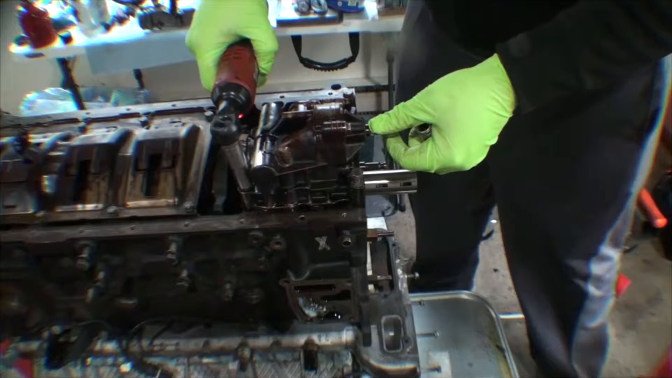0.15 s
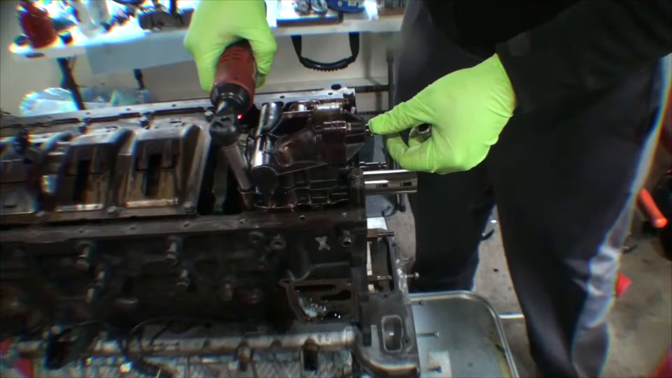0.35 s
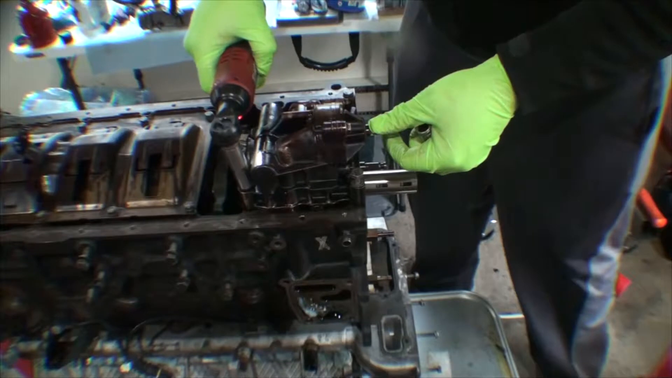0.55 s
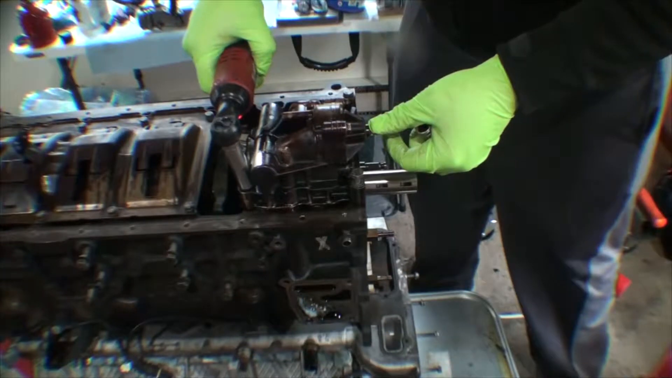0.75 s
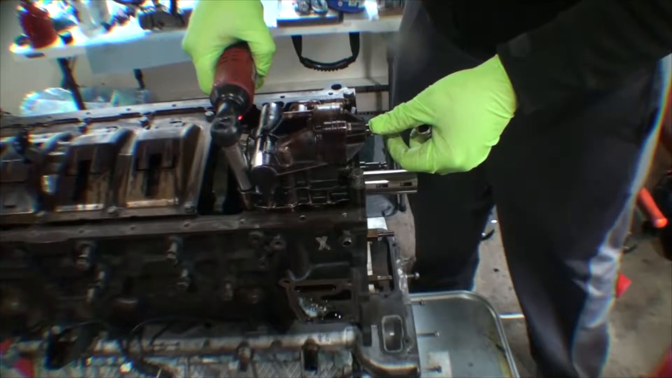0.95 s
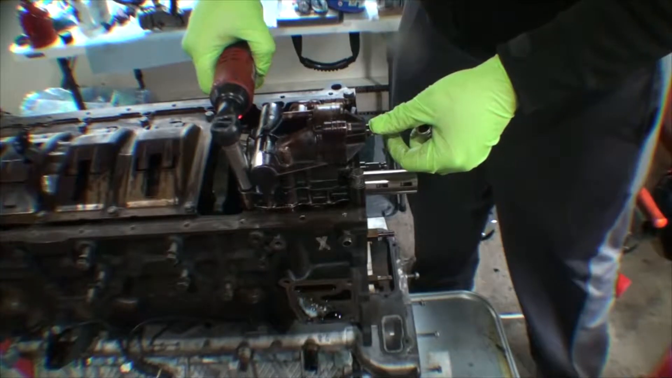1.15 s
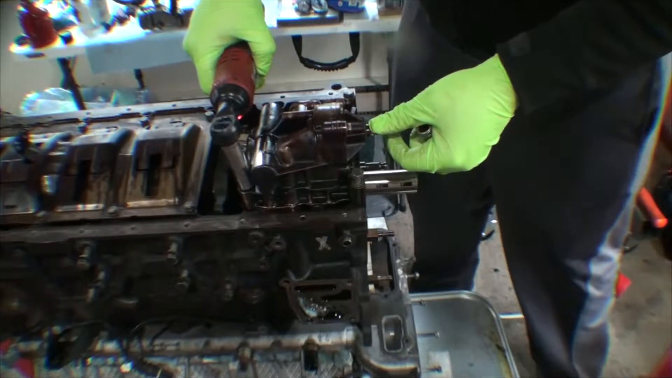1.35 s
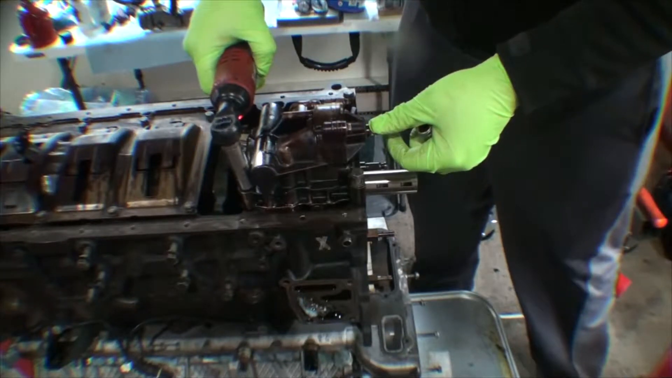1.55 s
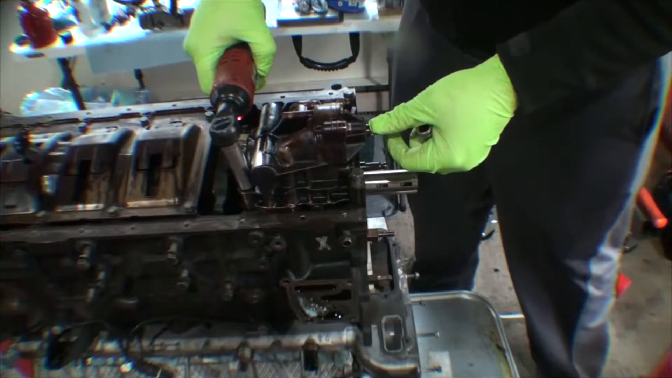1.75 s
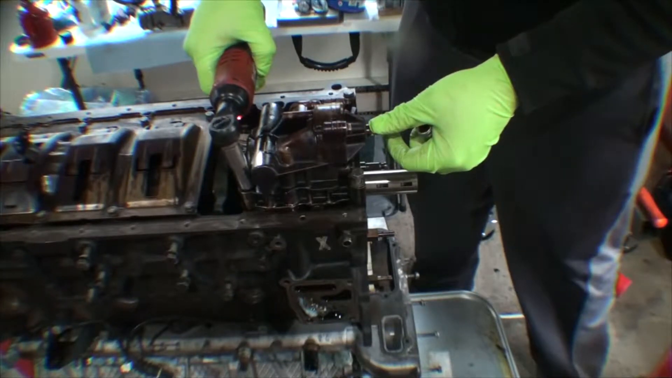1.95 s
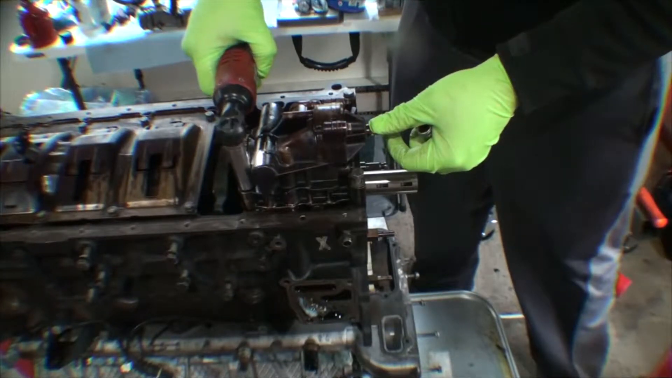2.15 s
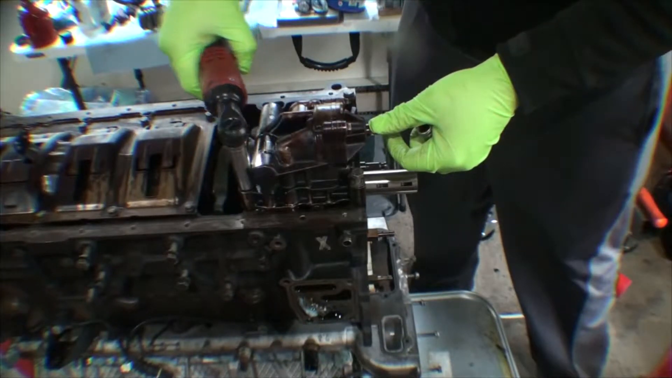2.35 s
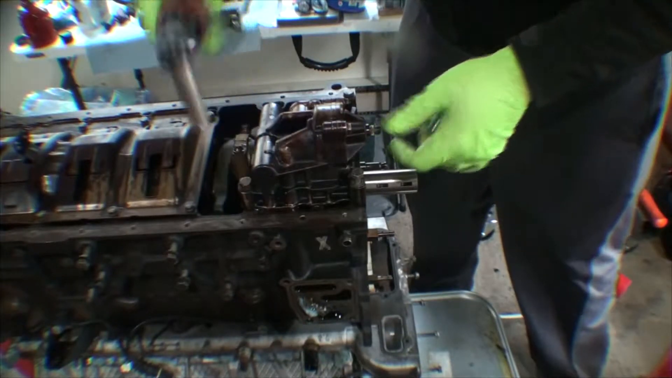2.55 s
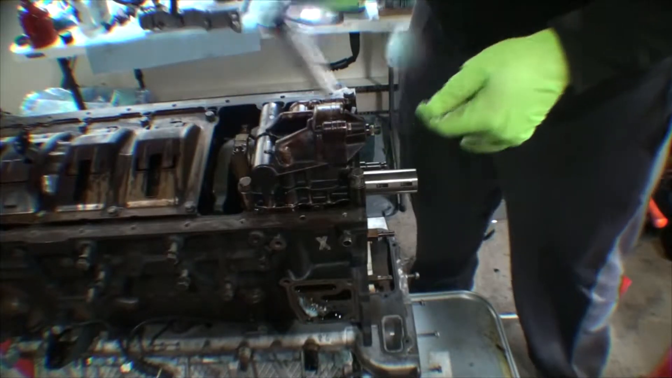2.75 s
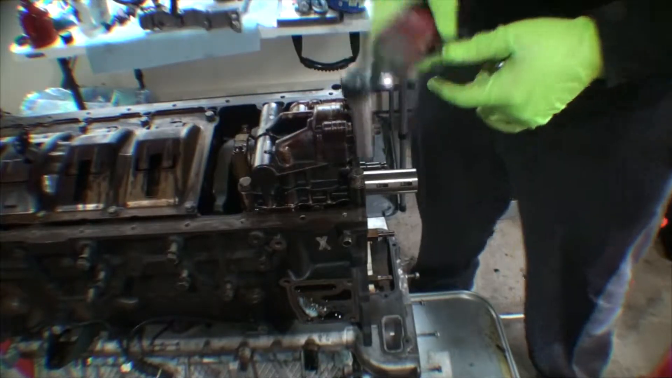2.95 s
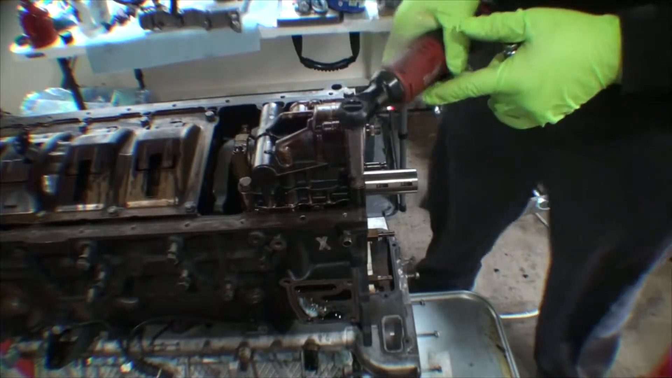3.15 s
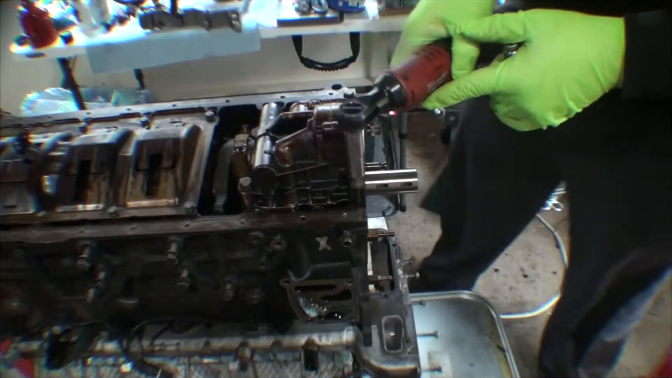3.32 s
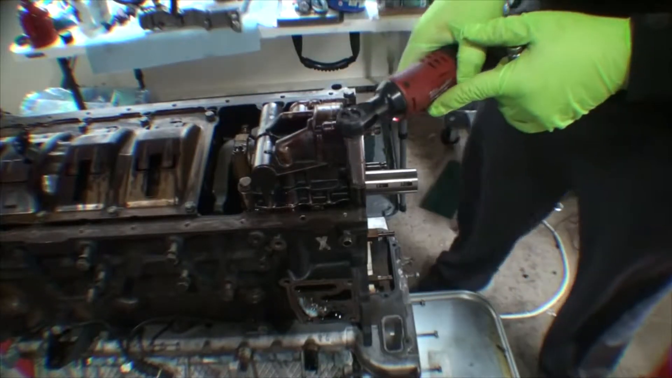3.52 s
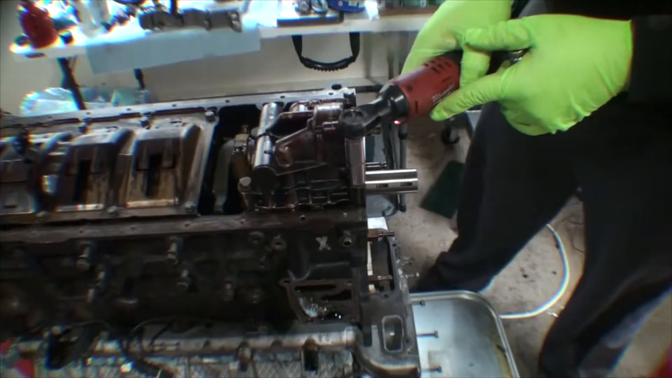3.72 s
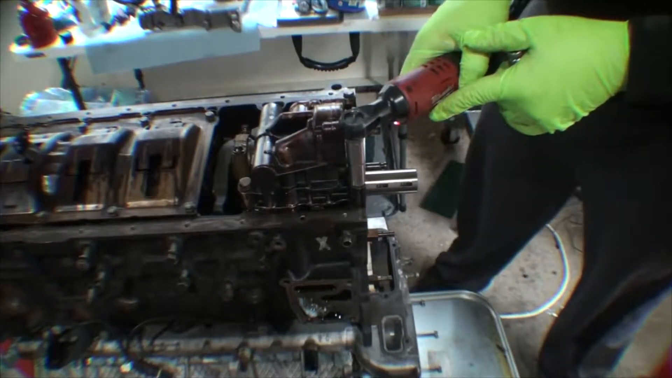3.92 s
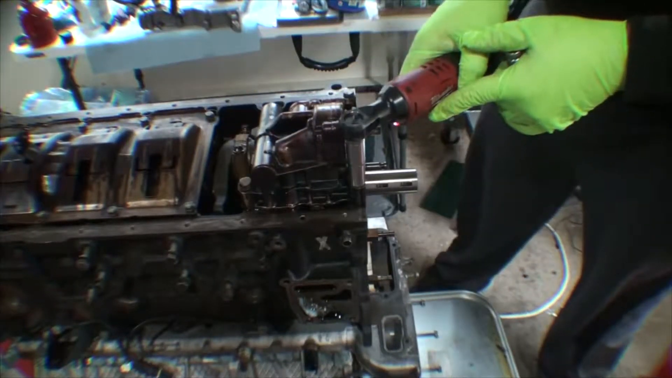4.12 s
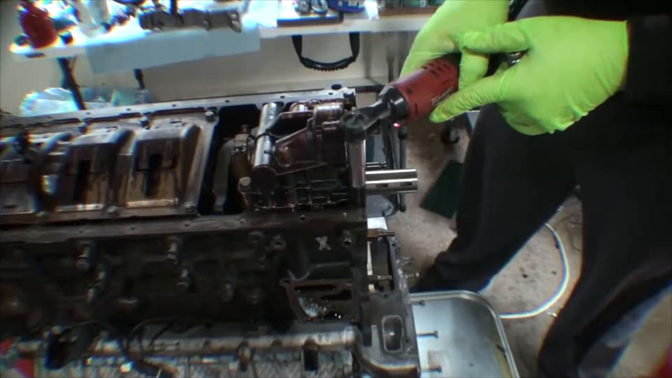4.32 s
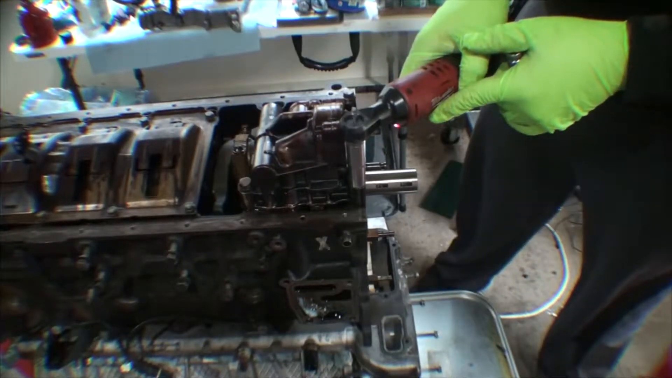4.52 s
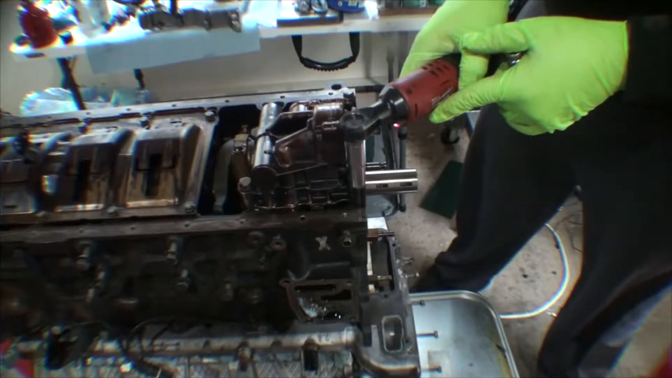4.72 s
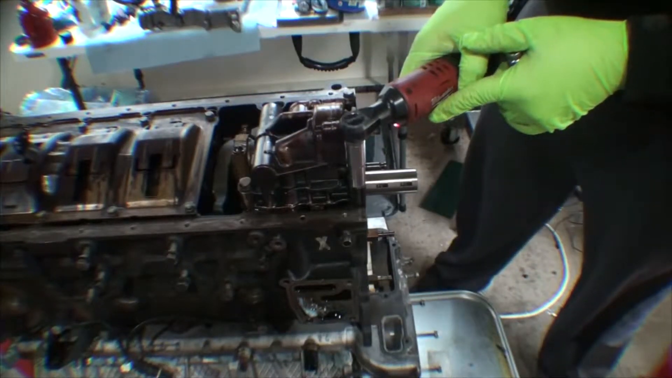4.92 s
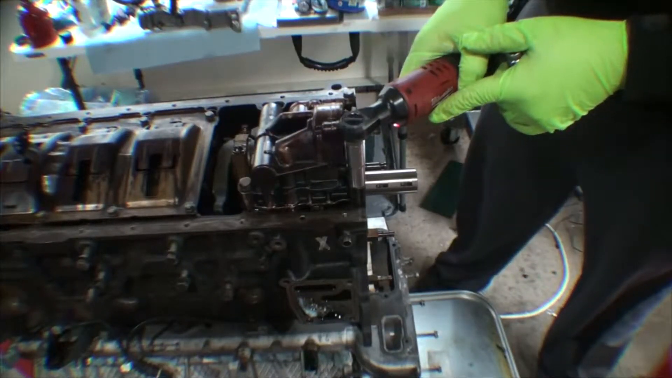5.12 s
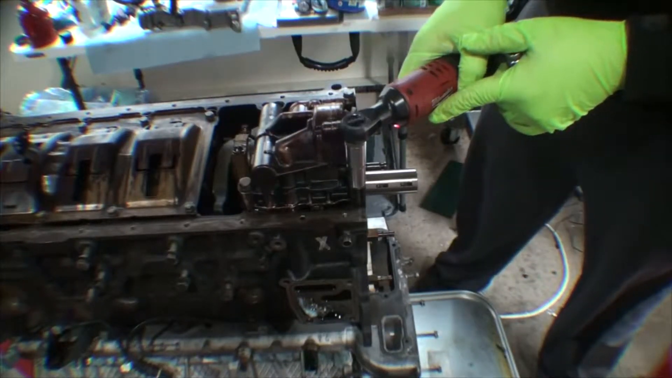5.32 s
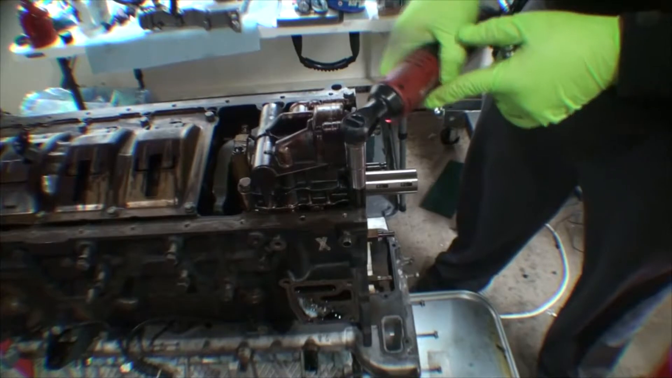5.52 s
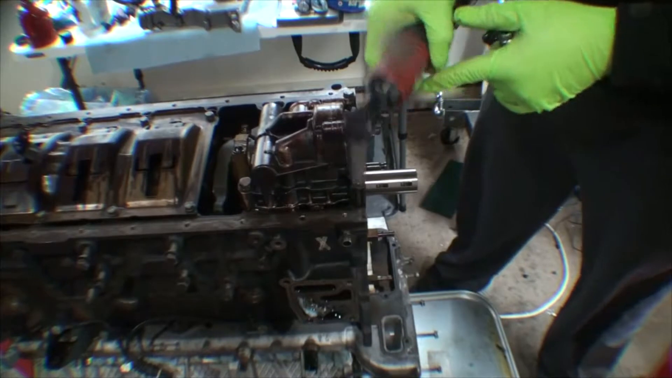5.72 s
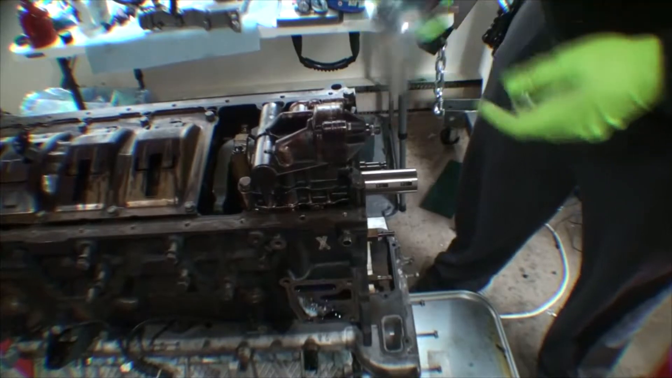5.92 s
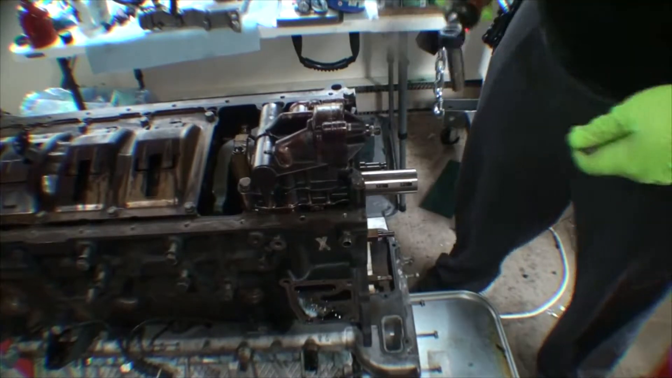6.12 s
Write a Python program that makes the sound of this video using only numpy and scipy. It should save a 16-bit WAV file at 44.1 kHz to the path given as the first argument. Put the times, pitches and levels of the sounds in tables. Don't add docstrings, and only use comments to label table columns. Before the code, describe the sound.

Already running, a power ratchet buzzes harshly on an engine block, rapid pawl clicks over gear rattle and brush hiss, sagging slowly in pitch until it knocks and stalls. It lifts off with light clinks and cloth rustle. A second, faster burst starts with a clatter, slows and ends in hard metallic knocks. Close stereo microphone, hard-walled workshop, quiet floor.

```python
import sys
import numpy as np
from scipy import signal
from scipy.fft import rfft, irfft, next_fast_len
from scipy.io import wavfile
from scipy.ndimage import uniform_filter1d

SR = 44100
rng = np.random.default_rng(int(sys.argv[2]) if len(sys.argv) > 2 else 0)


def ratio_of_db(decibels):
    return 10 ** (np.asarray(decibels, float) / 20)


def wav_out(sig):
    wavfile.write(sys.argv[1], SR, np.round(np.clip(np.atleast_2d(sig).T, -1, 1) * 32767).astype(np.int16))


N = 276504
T = np.arange(N) / SR

# time in seconds, drive in dB, pawl bite against drive in dB.
RUNS = [
    [(0, -22, -2), (.12, -25, 4.5), (.33, -25.5, 1.5), (.55, -25.5, 3.5), (.78, -26, 3.5),
     (1.25, -27.5, 5.5), (1.7, -26.5, 3.5), (2.09, -27, 4.5), (2.15, -28, 4), (2.26, -27, 1),
     (2.31, -26.5, 4.5), (2.33, -29, -15)],
    [(3.41, -64, -8), (3.428, -40.5, -30), (3.46, -31.5, -4.5), (3.51, -21.5, -5), (3.568, -21, -9),
     (3.585, -23.5, -1), (4.84, -23.5, 2.5), (5.15, -24, 0.3), (5.45, -25, -4), (5.52, -27, -7.5),
     (5.565, -22, -14)],
]
# level minus drive in dB, rise from in seconds, stall in seconds.
BRUSHES = [(-.4, -.3, 2.29), (3, 3.456, 5.54)]
# gears, pawl, pawl swing over the turn and yoke, all in dB.
BINDS = [(0.5, -3, 4.5, 2.5), (1.5, -1.5, 0.6, 1.5)]
STROKES_A_TURN, FIRST_BIND_STROKE = 20, 4.1


def level(x, db):
    return x * ratio_of_db(db) / np.sqrt(np.mean(x ** 2))


def colour(x, points, taps=2048):
    hz, db = np.transpose(points)
    bins_hz = np.fft.rfftfreq(taps, 1 / SR)
    log_gain = np.interp(np.log(bins_hz + 1), np.log(hz), db) * np.log(10) / 20
    cepstrum = irfft(log_gain)
    cepstrum[1:taps // 2] *= 2
    cepstrum[taps // 2 + 1:] = 0
    return signal.oaconvolve(x, irfft(np.exp(rfft(cepstrum))))[:len(x)]


def ring(x, hz, width_hz):
    return signal.lfilter(*signal.iirpeak(hz, hz / width_hz, SR), x)


def band(x, lo_hz, hi_hz):
    return signal.sosfilt(signal.butter(3, [lo_hz, hi_hz], "band", fs=SR, output="sos"), x)


def clicks(s, size):
    return np.bincount(np.clip(s * SR, 0, N - 1).astype(int), size, N)


def decay(s):
    return np.exp(-np.arange(int(8 * s * SR) + 2) / (s * SR))


def played(table, column, fall_s):
    s = np.transpose(table)[0]
    after_s = np.clip(T - s[-1], 0, None)
    return ratio_of_db(np.interp(T, s, column)) * np.exp(-after_s / fall_s) * (T >= s[0])


def swells(table, column, fall_s, rise_s=0.039):
    gain = np.zeros(N)
    for row in table:
        start_s, held_s = row[:2]
        rise = np.clip((T - start_s) / rise_s + 1, 0, 1)
        gain += ratio_of_db(row[column]) * rise * np.exp(-np.clip(T - start_s - held_s, 0, None) / fall_s)
    return gain


def walk(rate_hz):
    k = int(SR / rate_hz)
    return 2.0 * uniform_filter1d(np.repeat(rng.standard_normal(N // k + 1), k), k)[:N]


def shop():
    # frequency in Hz, level in dB.
    tone_shape = [(35, -25), (60, -10), (81, -17.5), (280, -12.5), (456, -9), (537, -11.5), (590, -12.5),
                  (817, -10.5), (962, -12.5), (3240, -21), (6510, -26), (13000, -33), (15800, -42)]
    # start in seconds, held in seconds, low band in dB, high band in dB.
    rustles = [
        (2.55, 0.029, -60, -69),
        (2.69, 0.026, -64, -59),
        (2.77, .04, -63, -76),
        (2.91, .03, -61, -66),
        (3.2, 0.14, -61, -83),
        (6.03, 0.027, -71, -66),
        (6.11, .02, -74, -76),
        (6.17, 0.038, -70, -70),
    ]
    # start in seconds, held in seconds, rumble in dB, frame in dB.
    shakes = [(.78, 0.026, -73, -50), (1.0, 0.11, -72, -58), (1.29, 0.35, -64, -50.5),
              (1.84, 0.24, -72, -56.5), (2.17, 0.076, -74, -51), (2.55, 0.28, -67, -69),
              (2.33, .13, -57, -61), (2.9, 0.38, -70.5, -61), (5.3, .05, -71.5, -58),
              (5.52, 0.057, -50, -44), (5.58, 0.081, -54, -57), (6.15, .12, -64, -69)]
    rustle_fall_s, shake_fall_s = 0.048, 0.056
    stand_db, frame_db = -74, -61.5
    tone = level(np.array([colour(rng.standard_normal(N), tone_shape) for _ in range(2)]), -57.5)
    for column, lo_hz, hi_hz in [(2, 100, 1500), (3, 4000, 12000)]:
        cloth = level(band(rng.standard_normal((2, N)), lo_hz, hi_hz), -0.75)
        tone += cloth * swells(rustles, column, rustle_fall_s)
    rumble = swells(shakes, 2, shake_fall_s)
    rattle = swells(shakes, 3, shake_fall_s)
    shake = level(band(rng.standard_normal(N), 28, 58), 0) * (ratio_of_db(stand_db) + rumble)
    frame = band(rng.standard_normal(N), 90, 281)
    shake += level(frame + ratio_of_db(5.0) * ring(frame, 180, 10), -8.5) * (ratio_of_db(frame_db) + rattle)
    return tone + shake * ratio_of_db(np.array([[-9.], [4.5]]))


def room(x):
    # frequency in Hz, t60 in seconds, level in dB, left-right likeness 0-1.
    walls = [(100, 0.37, 4.5, 0.9), (697, 0.41, 0.5, 0.85), (1990, 0.4, -1, 0.06), (5000, 0.41, -4, 0),
             (8900, 0.3, -1.5, 0), (14700, 0.19, -2.5, 0.4)]
    t = T[:SR // 2]
    hz, *columns = np.transpose(walls)
    tails = np.zeros((2, 2, len(t)))
    for f in 100 * 2 ** np.arange(0, 7.5, .5):
        t60_s, db, alike = (np.interp(np.log(f), np.log(hz), c) for c in columns)
        mid, side = band(rng.standard_normal((2, 2, 1, len(t))), f / 1.19, f * 1.19)
        alike = np.clip(alike, 0, 1)
        pairs = np.sqrt(1 + alike) * mid + np.sqrt(1 - alike) * side * np.array([[1], [-1]])
        tails += ratio_of_db(db) * pairs * 1000. ** (-t / t60_s) / np.sqrt(t60_s)
    far = (1 - np.exp(-(t / .014) ** 2)) * ratio_of_db(-38)
    near = ratio_of_db(-34) * (t > .0008) * np.exp(-t / .003)
    tails *= far + near
    angle = 2 * np.pi * 1.3 * T
    places = np.array([[x * np.cos(angle)], [x * np.sin(angle)]])
    return signal.oaconvolve(places, tails, axes=2)[..., :N].sum(axis=0)


def ports(pair):
    # frequency in Hz, left minus right in dB.
    balance = [(60, 3.5), (110, -3), (200, -9), (380, -5.5), (700, -2.0), (1290, -3.5), (2380, -3.5),
               (4400, -7), (8120, -5), (15000, -2)]
    # frequency in Hz, left port lead in radians.
    lead = [(0, 0), (260, -1.1), (600, -1.0), (2410, -0.7), (3010, -0.4), (4390, -0.4), (4910, -0.1),
            (6290, -0.4), (7670, 0.5), (9040, 1.0), (9650, 0.8), (11500, 0.0), (16600, -0.0)]
    size = next_fast_len(N)
    f = np.fft.rfftfreq(size, 1 / SR)
    hz, balance_db = np.transpose(balance)
    db = np.interp(np.log(f + 1), np.log(hz), balance_db)
    half = ratio_of_db(db / 2) * np.exp(.5j * np.interp(f, *np.transpose(lead)))
    return irfft(rfft(pair, size) * np.array([half, 1 / half]), size)[:, :N]


def rings():
    # start in seconds, pitch in Hz, level in dB, t60 in
    # seconds.
    lone_tones = [(.408, 418, -26, 0.081), (.42, 506, -32.5, 0.18), (2.249, 176, -52.5, 0.87),
                  (2.32, 398, -45, .1), (2.4, 172, -55.5, 0.28), (2.401, 435, -46, 0.081),
                  (3.275, 9740, -46, 0.048), (5.33, 406, -46, 0.3), (5.501, 548, -29, 0.089),
                  (5.518, 336, -28, 0.053), (5.55, 178, -49.5, 0.42), (5.552, 411, -34, 0.087),
                  (5.625, 320, -46, 0.12), (5.63, 1220, -54, 0.86), (5.699, 281, -61.5, 1.8),
                  (6.17, 225, -57, 0.45),
                  (3.411, 5560, -38, .12), (3.436, 5560, -38, .2), (5.62, 768, -46, .8),
                  (2.911, 870, -49, .07), (5.497, 1534, -19, .09), (5.503, 1640, -22, .06),
                  (5.5, 5050, -16, .05), (5.505, 4780, -20, .05), (5.513, 4950, -20, .04),
                  (5.52, 2250, -21, .06), (5.553, 1450, -21, .05), (3.274, 6595, -48, .2),
                  (3.274, 11140, -56, .05)]
    out = np.zeros(N)
    for s, hz, db, t60_s in lone_tones:
        t = np.clip(T - s, 0, None)
        out += ratio_of_db(db) * np.sin(2 * np.pi * hz * t) * (1 - np.exp(-t / 0.0028)) * 1000. ** (-t / t60_s)
    return out


def knocks():
    # start in seconds, peak in dB, pitch in Hz.
    clatter = [(.0732, -15, 3950), (.388, -18, 4400), (.4434, -15, 2400), (.463, -18, 2800),
               (.482, -17, 10000), (.541, -18, 10500), (.56, -19, 3000), (.84, -16, 2310),
               (.8604, -18, 2680), (.88, -17, 9500), (1.178, -19, 7000), (1.263, -17, 2840),
               (1.284, -19, 2690), (1.3054, -19, 4680), (1.696, -18, 2880), (1.7394, -15, 5500),
               (1.8048, -18, 5200), (1.8272, -17, 3560), (2.092, -19, 6400), (2.137, -19, 5500),
               (2.16, -18.5, 993), (2.2105, -11, 10400), (2.236, -11, 10500), (2.262, -17.5, 2300),
               (2.314, -15, 2340), (2.35, -20.5, 11000), (3.4588, -17.5, 12800), (3.4645, -17.5, 11000),
               (3.47, -21, 4210), (3.489, -12.5, 2950), (3.524, -18, 2730), (3.542, -15, 4380),
               (3.556, -19, 3500), (3.567, -11, 2790), (3.619, -26, 3900), (5.439, -14, 3060),
               (5.473, -18, 2390), (5.495, -10, 3100), (5.497, -15, 1600), (5.518, -11, 5600),
               (5.549, -13.5, 10800), (5.552, -9.5, 3000), (4.364, -11.5, 5170), (4.443, -12, 3790),
               (4.482, -20, 3500), (4.78, -16.5, 900), (5.075, -17, 1000), (5.293, -18, 3000),
               (5.317, -15, 3100), (5.413, -16, 11000)]
    # start in seconds, peak in dB, treble minus peak in dB,
    # slide minus peak in dB, pitch in Hz.
    handling = [(2.388, -29, 0.5, -9, 3000), (2.399, -19.5, -7, -17, 3000), (2.502, -41, -4, -7, 2360),
                (2.909, -39.5, -35, -24, 1300), (2.982, -51, -14, -16, 2500), (3.274, -26, -8, -13.5, 4300),
                (3.285, -35.5, -12, -7, 3600), (3.297, -36, -16, -9, 3500), (3.422, -28.5, -9.5, -16, 1700),
                (5.602, -29, -3, -23, 11000), (5.613, -19, -22, -24.5, 13000),
                (5.6253, -13, -22, -17, 5500), (5.808, -44.5, -20, -7, 977), (6.03, -50, -20, -9, 3500)]
    # frequency in Hz, level in dB, t60 in seconds.
    socket_modes = [(833, -12.5, 0.083), (1500, -0.5, .05), (2300, 6.5, 0.045), (3060, -28, .04),
                    (4630, -5, 0.052), (5660, 11, 0.09)]
    # frequency in Hz, level in dB.
    slide_shape = [(500, -23), (800, 5), (2000, 3.5), (4000, 2.5), (7000, -1), (9000, -11.5), (14000, -30)]
    burst_s, burst_cycles = 0.0013, 3.5
    clatter_treble_db, clatter_slide_db = -4.5, -16
    mid, high, slide, pitched = np.zeros((4, N))
    noise = rng.standard_normal((2, N + SR))
    t = T[:8192]
    events = handling + [(s, db, clatter_treble_db, clatter_slide_db, hz) for s, db, hz in clatter]
    for s, db, treble_db, slide_db, hz in events:
        at = slice(int(s * SR), int(s * SR) + len(t))
        envelope = np.exp(-t / (burst_s + burst_cycles / hz)) * (1 - np.exp(-t / 0.00026))
        crunch = ratio_of_db(db) * envelope * np.sign(noise[0, at])
        mid[at] += crunch
        high[at] += crunch * ratio_of_db(treble_db) * np.exp(-t / 0.0034)
        pitched[at] += ring(ring(crunch, hz, 0.4 * hz), hz, 1.6 * hz)
        slide[at] += ratio_of_db(db + slide_db) * t / 0.011 * np.exp(1 - t / 0.009) * noise[1, at]
    socket = sum(ratio_of_db(db) * ring(mid, hz, 5.4 / t60_s) for hz, db, t60_s in socket_modes)
    return (ratio_of_db(3) * band(mid, 750, 5200) + ratio_of_db(2) * pitched + ratio_of_db(-6) * socket
            + ratio_of_db(-1) * colour(slide, slide_shape) + ratio_of_db(6) * band(high, 6000, 12000))


def yoke(k, turns):
    # level minus drive in dB, low, high and top ring in Hz.
    yoke_rings = [(-10, 2530, 4300, 10300), (-12, 3300, 5100, 10900)]
    loaded_share = .12
    chance = rng.standard_normal((int(turns[-1]), 2))
    stroke = np.arange(len(chance))
    turn = (stroke - int(FIRST_BIND_STROKE)) / STROKES_A_TURN % 1
    db = 2.6 * np.tanh(chance[:, 0]) + BINDS[k][3] * np.exp(-turn / loaded_share)
    at = stroke + FIRST_BIND_STROKE % 1 + .03 * chance[:, 1]
    hits = clicks(np.interp(at, turns, T), ratio_of_db(db))
    crunch = signal.oaconvolve(hits, decay(.0011))[:N] * np.sign(rng.standard_normal(N))
    gain_db, low_hz, high_hz, top_hz = yoke_rings[k]
    rung = ring(crunch, low_hz, 700) + ring(crunch, high_hz, 2200) + .8 * ring(crunch, top_hz, 1800)
    return level(rung, gain_db)


def whine(k, speed_hz, turns):
    # level in dB, resonance in Hz, width in Hz.
    whine_peaks = [(-41.5, 728, 70), (-45, 830, 120)]
    teeth_per_stroke = 13.3
    db, hz, width_hz = whine_peaks[k]
    _, rise_s, stall_s = BRUSHES[k]
    on = uniform_filter1d(1. * (T > rise_s + .12) * (T < stall_s), SR // 10)
    swell = 1 / (1 + ((teeth_per_stroke * speed_hz - hz) / width_hz) ** 4)
    return ratio_of_db(db + 0.9 * walk(18)) * on * swell * np.sin(2 * np.pi * teeth_per_stroke * turns)


def ratchet(k, turns):
    # place in stroke 0-1, level in dB.
    teeth_passed = [
        [(.07, -1.5), (.22, 2), (.37, -9.5), (.52, -4.5), (.66, 0.5), (.8, 13), (.94, 11.5)],
        [(.06, -21), (.22, -7), (.33, 3), (.46, -3), (.56, 1.5), (.72, -6.5), (.9, 1.5)],
    ]
    # frequency in Hz, width in Hz, level in dB.
    head_modes = [
        [(7320, 1230, -12.5), (11040, 440, -3), (12750, 2000, -10), (12530, 580, 6), (12770, 950, -8)],
        [(7700, 670, 0.7), (10920, 660, 2.5), (11700, 460, 1), (12570, 440, 2.5), (12830, 390, 1.5)],
    ]
    # frequency in Hz, level in dB per Hz.
    gear_shape = [
        [(88, -49), (150, -28.5), (269, -23.5), (336, -16.5), (542, -10.5), (689, -2), (832, -1), (971, -1),
         (1300, -0.5), (2250, 2), (2580, 1.5), (3570, 3), (9000, -4.5), (11700, -30.5), (19800, -120)],
        [(88, -63.5), (150, -52), (178, -22.5), (211, -47), (288, -32.5), (347, -22), (643, -13.5), (876, -2.5),
         (1320, -5.5), (3510, 0.5), (6280, -10), (7580, -3.5), (9000, -8), (11700, -26), (19800, -120)],
    ]
    # frequency in Hz, width in Hz, level in dB.
    body_modes = [
        [(336, 26, 9.5), (740, 88, -4.5), (943, 61, 0), (2200, 260, -8.5), (3630, 260, -29)],
        [(342, 20, -1), (944, 310, -14.5), (1965, 280, -10), (3000, 89, -26), (5340, 180, -12)],
    ]
    # frequency in Hz, level in dB.
    hiss_shape = [
        [(2400, -37), (4000, -6), (6500, -4.5), (8800, -8), (11600, 2), (13400, -32), (13900, -1),
         (15800, -10.5)],
        [(2400, -47), (4000, -8.5), (6500, -2.5), (8800, -8), (11000, 0), (13400, -5.5), (13900, -5.5),
         (15800, -8.5)],
    ]
    spin_up_s = 0.018
    bind_share, slack_turn = 0.033, 0.33
    s, drive_db, bite_db = np.transpose(RUNS[k])
    place, tooth_db = np.transpose(teeth_passed[k])
    chance = rng.standard_normal((int(turns[-1]), len(place), 3))
    at = np.arange(len(chance))[:, None] + place + .02 * chance[..., 0]
    stroke_db = 1.1 * np.tanh(uniform_filter1d(chance[:, :1, 2], 5, axis=0) * 2)
    click_db = tooth_db + 2.8 * np.tanh(chance[..., 1]) + stroke_db
    teeth = clicks(np.interp(at, turns, T).ravel(), ratio_of_db(click_db).ravel())
    scrape = signal.oaconvolve(teeth, decay(0.00075))[:N] * np.tanh(rng.standard_normal(N))
    head = sum(ratio_of_db(db) * ring(ring(scrape, hz, 2.2 * w), hz, 1.6 * w) for hz, w, db in head_modes[k])

    loose = rng.random((9000, 2))
    rattle = clicks(loose[:, 0] * T[-1], ratio_of_db(-3.0 * np.log(loose[:, 1] + 0.044)))
    rattle = signal.oaconvolve(rattle, decay(0.00062))[:N] * rng.standard_normal(N)
    rattle *= ratio_of_db(1.2 * np.tanh(walk(30)))
    drive = level(rattle, 4.5) + level(scrape, -1.2) + level(rng.standard_normal(N), -0.78)
    gears = colour(drive, gear_shape[k])
    gears = gears + sum(ratio_of_db(db) * ring(gears, hz, w) for hz, w, db in body_modes[k])

    rub = level(rattle, 7.2) + level(scrape, -0.5) + level(rng.standard_normal(N), 5.8)
    hiss = colour(rub, hiss_shape[k])
    hiss_db, rise_s, stall_s = BRUSHES[k]
    spinning = np.clip((T - rise_s) / spin_up_s, .2, 1) * np.exp(-np.clip(T - stall_s, 0, None) / 0.0074)

    turn = (turns - FIRST_BIND_STROKE) / STROKES_A_TURN % 1
    bind = np.exp(-turn / bind_share)
    gears_db, pawl_db, swing_db, _ = BINDS[k]
    pawl_gain = ratio_of_db(pawl_db * bind - swing_db * np.cos(2 * np.pi * (turn - slack_turn)))
    return (level(gears, -2.7) * played(RUNS[k], drive_db, 0.016) * ratio_of_db(gears_db * bind)
            + level(hiss, -2.3) * played(RUNS[k], drive_db + hiss_db, .015) * spinning
            + level(head, -3.5) * played(RUNS[k], drive_db + bite_db, .013) * pawl_gain
            + yoke(k, turns) * played(RUNS[k], drive_db, .016))


def scene():
    # time in seconds, speed in strokes Hz.
    crank_speeds = [
        [(0, 57.3), (.3, 53.4), (.6, 50.5), (.9, 48.4), (1.1, 46.9), (1.5, 46.1), (1.95, 45.5), (2.1, 44.3),
         (2.35, 35.5)],
        [(3.4, 45), (3.52, 72), (3.7, 78), (4.75, 77.8), (4.87, 70), (5.0, 65), (5.3, 58.3), (5.45, 55),
         (5.65, 50)],
    ]
    speed_hz = np.interp(T, *np.transpose(crank_speeds[0] + crank_speeds[1]))
    turns = np.cumsum(speed_hz) / SR
    tool = sum(ratchet(k, turns) + whine(k, speed_hz, turns) for k in range(2)) + knocks() + rings()
    return ports(tool + room(tool)) + shop()


def dropouts(x):
    # from in seconds, to in seconds.
    top_gaps = [
        (.37, .405),
        (.675, .7),
        (1.187, 1.2),
        (1.57, 1.59),
        (2.045, 2.06),
        (2.085, 2.1),
        (2.43, 2.6),
        (3.274, 3.41),
        (5.635, 5.8),
    ]
    out, weakness = x.copy(), walk(17)
    first_stall_s = RUNS[0][-1][0]
    gaps = sum(1. * (T > a) * (T < b) for a, b in top_gaps)
    for lo_hz in (13800, 14300, 14800, 15300):
        limit = 1.0 + (lo_hz - 13800) / 2500 + 2.5 * (T > first_stall_s)
        lost = uniform_filter1d(1. * (weakness + .6 * walk(30) > limit), 256)
        lost = np.maximum(lost, uniform_filter1d(gaps * (lo_hz > 14000), 64))
        strip = signal.butter(3, [lo_hz - 60, lo_hz + 560], "band", fs=SR, output="sos")
        out -= lost * signal.sosfiltfilt(strip, out)
    return out


def roll_off(x):
    return signal.sosfilt(signal.butter(12, 17030, fs=SR, output="sos"), x)


def record(dry):
    top_cut = signal.ellip(10, .2, 70, 15900, fs=SR, output="sos")
    rounded = np.tanh(1.5 * dry) / 1.5
    return roll_off(dropouts(signal.sosfilt(top_cut, rounded)))


dry = scene()
out = record(dry)
wav_out(out)
```